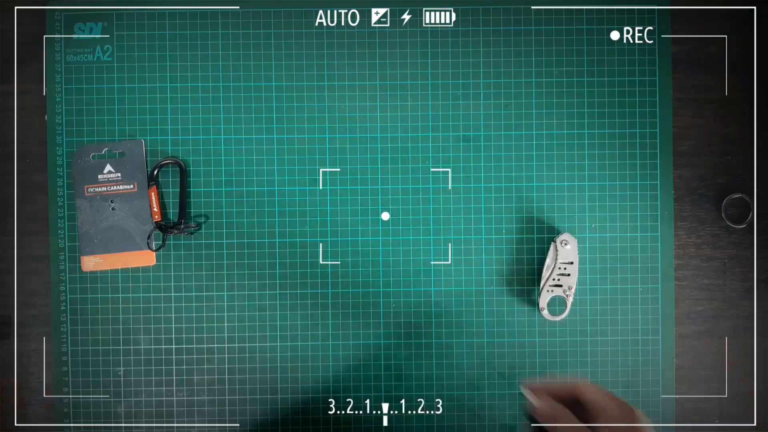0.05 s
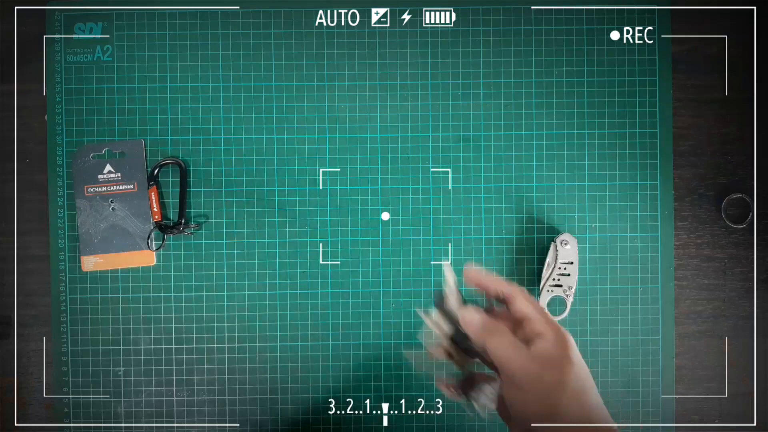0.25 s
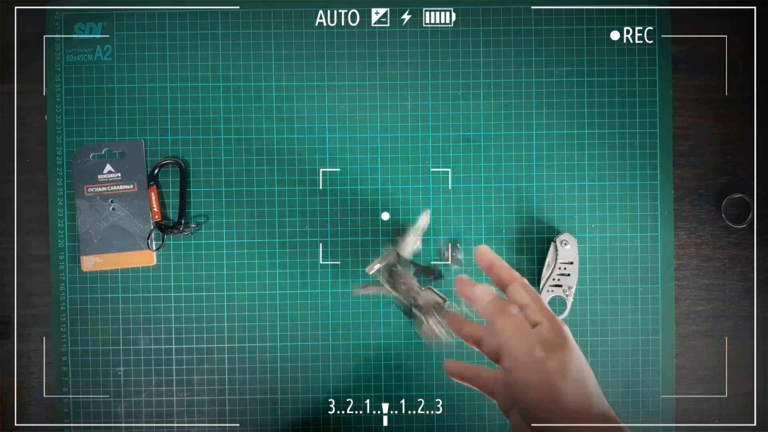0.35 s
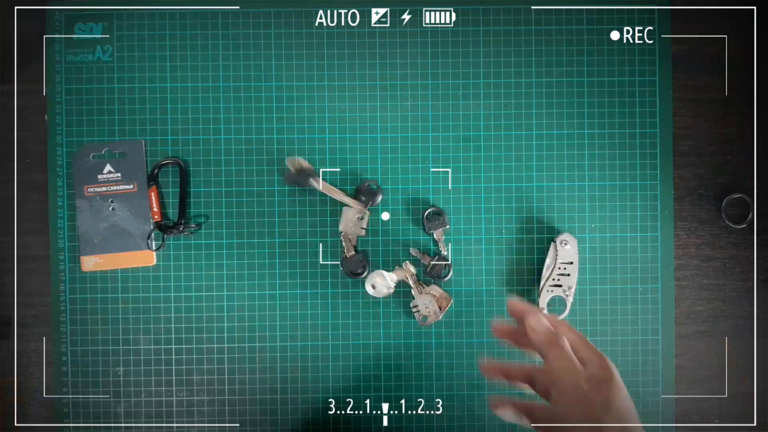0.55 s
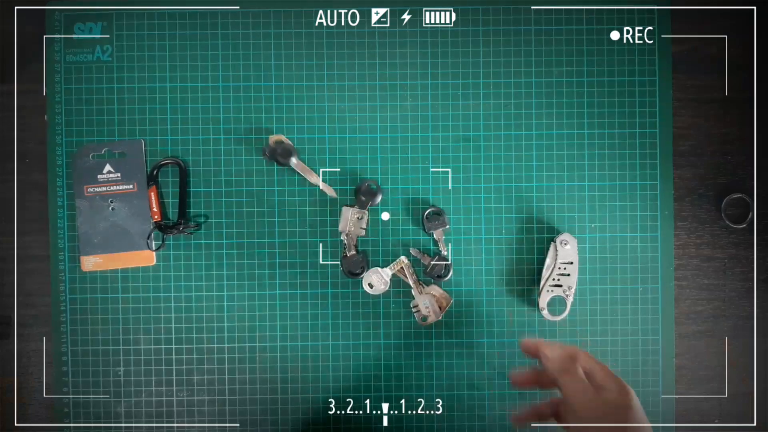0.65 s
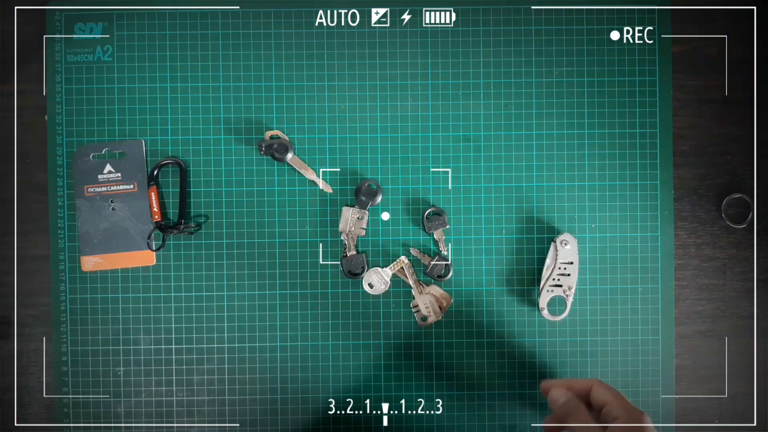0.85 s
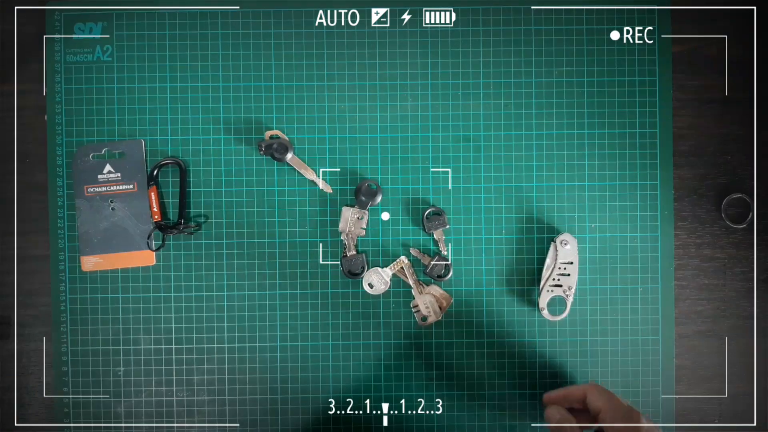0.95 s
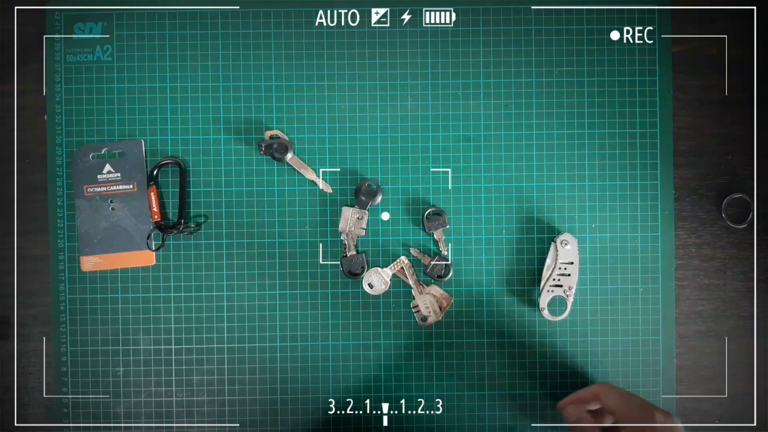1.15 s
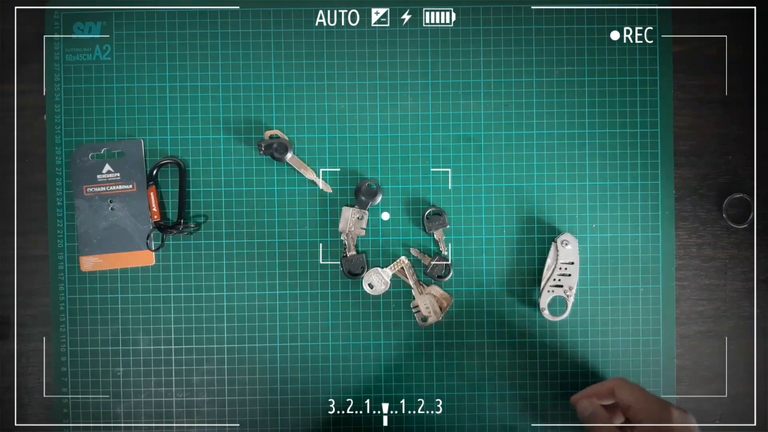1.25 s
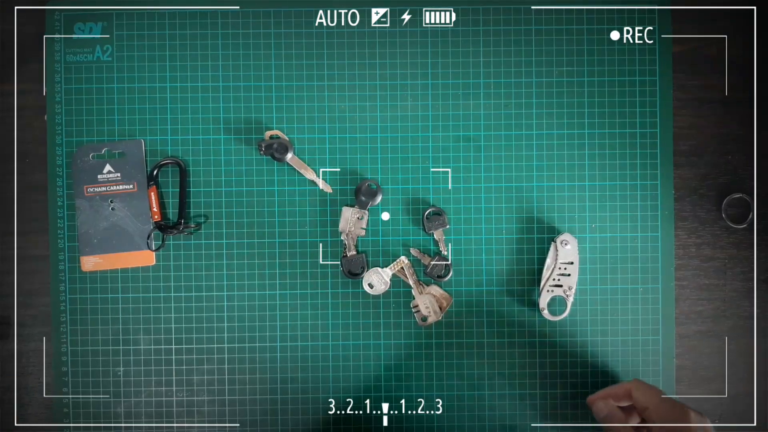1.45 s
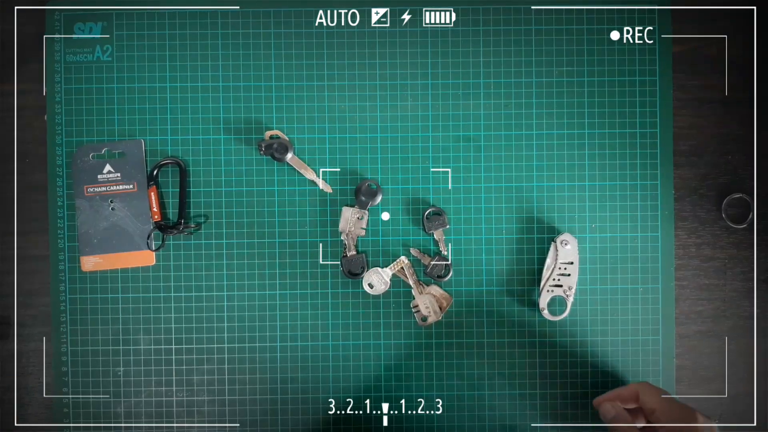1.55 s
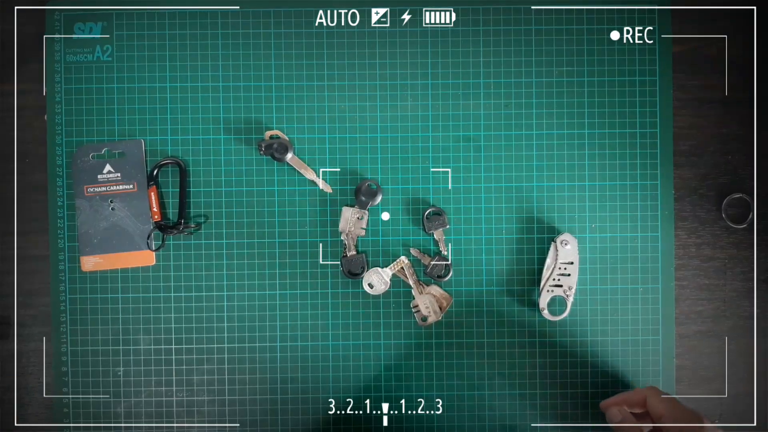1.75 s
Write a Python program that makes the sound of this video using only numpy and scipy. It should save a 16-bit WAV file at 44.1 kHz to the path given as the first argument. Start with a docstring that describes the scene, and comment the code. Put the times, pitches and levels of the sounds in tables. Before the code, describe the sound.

Keys jingle lightly as a sleeve rustles, then clatter onto a cutting mat, thumping the desk beneath. They ring briefly, slide and come to rest, with the microphones close by in a small room.

```python
"""A sleeve rustles and a bunch of keys clinks in a hand, then is tossed onto a cutting mat on a desk.
Each clash of metal excites the free vibration of a blade or ring, and the heavy key heads thump the
desk twice, driving its low modes. The blades ring on while the last keys slide, tip over and settle.
Two spaced microphones stand close by, in the reverberant field of a small room."""
import sys
import numpy as np
from scipy import signal
from scipy.fft import rfft, irfft
from scipy.io import wavfile
from scipy.ndimage import uniform_filter1d

SR = 44100
rng = np.random.default_rng(int(sys.argv[2]) if len(sys.argv) > 2 else 0)


def file_out(sig):
    """Save sig as 16-bit WAV at sys.argv[1]."""
    # one column per channel
    cols = np.atleast_2d(sig).T
    # limit, then scale
    lim = np.clip(cols, -1, 1)
    pcm = np.round(lim * 32767).astype(np.int16)
    wavfile.write(sys.argv[1], SR, pcm)


N = 79380

# Noise spectra. Each row: frequency in Hz, relative spectral density in dB.
SLEEVE_SPECTRUM = [(25, -39), (60, -9), (120, 2.5), (200, -6), (330, -8.5), (1400, -15.5), (3000, -24.5),
                   (15000, -35.5)]
AIR_SPECTRUM = [(25, -30), (82, -4.5), (178, -5), (209, -10.5), (322, -5.5), (389, -16.5), (848, -15),
                (15500, -48.5)]
TICK_SPECTRUM = [(300, -19), (1500, -14), (2500, 0), (5800, -11.5), (6800, 1.5), (8700, -7), (9700, -3.5),
                 (11300, -1), (12700, 5.5), (15000, -2)]  # metal on metal
THUD_SPECTRUM = [(30, -30.5), (70, -2.5), (120, 0), (500, -13), (8000, -69.5)]  # the struck mat
CLACK_SPECTRUM = [(150, -6.5), (500, 5.5), (690, -3), (880, 0), (2600, -3.5), (4200, -13.5), (6000, -19.5),
                  (15000, -17)]  # a key head on the mat
SNAP_SPECTRUM = [(500, -10), (2700, 0.5), (4800, -3), (15000, -34)]  # edge on edge
# Coherence of the sleeve and air noise. Each row: frequency in Hz, left-right correlation.
COHERENCE = [(30, 0.087), (120, 0.95), (300, 0.7), (1000, 0.12), (4000, 0.12), (15000, 0.11)]
# Envelopes. Each row: time in seconds, level in dB.
RUSTLE_LEVEL = [(0.028, -36.5), (0.078, -41), (.2, -39.5), (.39, -37), (.72, -45), (0.851, -69)]
RATTLE_LEVEL = [(.355, -44), (.41, -21.5), (.46, -32), (.51, -27), (.6, -36), (.63, -39.5)]
SLIDE_LEVEL = [(0.496, -53), (.52, -26.5), (.55, -48), (.6, -31), (.635, -45), (.72, -41), (0.751, -59.5)]
# Modes of each metal piece, and of the desk. Each row: frequency in Hz, level in dB, T60 in seconds.
KEY_MODES = { "held": [(6800, -21, .045), (9560, -9, .08), (9820, -8.5, .055), (10900, -15, 0.13),
             (13370, -0.5, .05), (12780, -1, 0.046)], "ring": [(6650, -9, 0.12), (10050, -1.5, 0.081),
             (13400, -3.5, .06)], "flat": [(6825, -4.5, .3), (9525, -3, .2), (10020, -13, .25),
             (10850, -10, .25), (13115, 0, .3)], "short": [(6970, -11.5, .088), (12150, -7.5, .03),
             (12570, 3, .09)], "thin": [(12560, -5.5, .19), (13170, -0.5, 0.14)], "long": [(6847, -6, .3),
             (11750, -4.5, .36), (12606, -2.5, .3), (12940, -8, .28), (15375, -4.5, .4)], }
DESK_MODES = [(108, -19.5, 0.3), (250, -19, .033), (321.4, -8, .063), (381, -14.5, .05), (527, -12, 0.089),
              (846, -14, .09), (970.5, -21, .06), (1198.6, -21.5, .1)]
# Metal striking metal. Each row: start in seconds, piece struck, ring level in dB, tick level in dB.
CLINK_EVENTS = [ (.1305, "ring", -34.5, -31), (.139, "held", -40.5, -39), (.2098, "held", -11, -20),
                (.217, "held", -26.5, -24), (.2255, "ring", -33, -26), (.2762, "held", -31.5, -29),
                (.2955, "flat", -31, -30), (.2965, "short", -27.5, -32.5), (.343, "short", -18.5, -25),
                (.347, "flat", -27, -32), (.352, "long", -36, -33), (.398, "flat", -24, -22.5),
                (.4016, "held", -16.5, -21.5), (.407, "ring", -12, -20.5), (.423, "short", -19.5, -22),
                (.432, "flat", -23.5, -23.5), (.4365, "thin", -14.5, -13), (.4435, "held", -17, -17.5),
                (.4555, "long", -9, -21), (.467, "short", -17.5, -20.5), (.492, "flat", -23, -28),
                (.575, "thin", -31, -22), ]
# Blows on the mat. Each row: start in seconds, thump, desk ring and clack levels in dB, contact in ms.
MAT_BLOWS = [ (0.3948, -10, -6.5, -4.5, 0.06), (0.3976, -9, 1, -12, .4), (.4036, -9.5, -5, -7, .4),
             (0.4097, -17, -13.5, -12, .4), (0.418, -12.5, -20.5, -13.5, 0.16),
             (0.4412, -11.5, -21, -15, 0.21), (0.4442, -7, -19, -9.5, 0.11), (.447, -17, -17, -13.5, .25),
             (0.4519, -1.5, -11.5, -6, .22), (0.6567, -31.5, -26, -56, .4), ]
# Hard edges of the key heads meeting. Each row: start in seconds, level in dB.
EDGE_SNAPS = [(0.3947, -15), (.452, -15), (0.6571, -24.5)]
# Desk resonances driven by sliding. Each row: frequency in Hz, width in Hz, level in dB.
HUM_RESONANCES = [(129, 16, -2.5), (317, 38, 0.5)]
# Decay of the room. Each row: frequency in Hz, T60 in seconds.
REVERB_T60 = [(100, 0.14), (330, 0.97), (1000, 0.74), (3000, 0.3254), (7000, 0.4536), (14000, 0.57)]
# Strength of the reverberation. Each row: frequency in Hz, level in dB.
REVERB_LEVEL = [(100, -20.5), (330, -15.5), (1000, -14), (3000, -7), (7000, -2), (14000, -12)]

KEYS_PAN_DB, THUMP_PAN_DB, CLACK_PAN_DB, AIR_PAN_DB = 1.2, 2.5, 2, 2
CHATTER_DB, TUMBLE_DB, PATCH_DB, GRAIN_DB = 6, 2, 1.5, 1.5  # rms level fluctuations
RING_RISE_S, RESTING_S, MAT_DAMPING_DB_PER_S = .00057, .62, 204
RATTLE_PER_S, RATTLE_SPREAD_DB, RATTLE_RING_DB, RATTLE_DETUNE = 220, 1.5, -2.5, .007
OVERTONES_DB, IN_HAND_DB, LET_GO_S, SHAKE_DB = -2.5, -5, .33, -8.5
PUSH_DB, GIVE_HZ, GIVE_DB, THUD_DB, CLACK_CORRELATION = 8, 103, -13.5, -11, .43
SCRAPE_START_S, SCRAPE_LENGTH_S, SCRAPE_DB = .645, .099, -42
ROOM_BUILD_S, RING_SEND_DB, TICK_SEND_DB, AIR_DB = .012, -12.5, -7, -51
LOW_CUT_HZ, HIGH_CUT_HZ = 40, 15650


def amp(db):
    """Amplitude ratio of a level in decibels."""
    return 10 ** (np.asarray(db) / 20)


def unit(x):
    """Normalisation to an rms of 1."""
    return x / np.sqrt(np.mean(x ** 2) + 1e-20)


def at_hz(table, hz):
    """Interpolation on a log-frequency axis."""
    f, value = np.transpose(table)
    return np.interp(np.log(hz + 1), np.log(f + 1), value)


def pan(db):
    """Channel gains for a level difference of left over right."""
    return amp([[db / 2], [-db / 2]])


def decay(t, t60):
    """Exponential damping: 60 dB lost in t60 seconds."""
    return np.exp(-np.log(1000) * t / t60)


def add(mix, start, sound):
    """Superposition of a sound from a start in seconds."""
    part = mix[:, round(start * SR):][:, :sound.shape[-1]]
    part += sound[..., :part.shape[1]]


def noise(spectrum, correlation, size):
    """Partial coherence: the two channels share part of one coloured noise."""
    shared, own = rfft(rng.standard_normal((2, size)))
    pair = np.array([shared, correlation * shared + np.sqrt(1 - correlation ** 2) * own])
    return unit(irfft(pair * amp(at_hz(spectrum, np.fft.rfftfreq(size, 1 / SR))), size))


def drifting_noise(spectrum):
    """Random modulation makes a steady noise drift in patches of time and frequency."""
    steady = noise(spectrum, at_hz(COHERENCE, np.fft.rfftfreq(N, 1 / SR)), size=N)
    bands = signal.stft(steady, nperseg=1024)[2]
    patches = uniform_filter1d(rng.standard_normal(bands.shape[1:]), size=10, axis=0)
    patches = unit(uniform_filter1d(patches, size=5, axis=1))
    return pan(AIR_PAN_DB) * unit(signal.istft(bands * amp(PATCH_DB * patches))[1][:, :N])


def sleeve():
    """Friction of cloth radiates broadband noise that fades after the toss."""
    level_db = np.interp(np.arange(N) / SR, *np.transpose(RUSTLE_LEVEL))
    return drifting_noise(SLEEVE_SPECTRUM) * amp(level_db)


def burst(spectrum, correlation, t60):
    """A chattering contact radiates a noise transient that decays exponentially."""
    hiss = noise(spectrum, correlation, size=4096)
    chatter = amp(CHATTER_DB * unit(uniform_filter1d(rng.standard_normal(hiss.shape[1]), size=40)))
    return hiss * unit(chatter) * decay(np.arange(hiss.shape[1]) / SR, t60)


def clink(piece, ring_db, tick_db, tuning=1):
    """An impact ticks and excites damped modes, each with its own phase at each microphone."""
    t = np.arange(SR // 2) / SR
    modes = sum(amp(db) * decay(t, t60) * np.sin(2 * np.pi * (tuning * hz * t + rng.random((2, 1))))
                for hz, db, t60 in KEY_MODES[piece])
    ring = amp(ring_db) * modes * (1 - np.exp(-t / RING_RISE_S))
    return ring, amp(tick_db) * burst(TICK_SPECTRUM, correlation=0, t60=.037)


def keys():
    """Clinks and a random rattle superpose; tumbling modulates their ring until the mat damps it."""
    rings, ticks, t = np.zeros((2, N)), np.zeros((2, N)), np.arange(N) / SR
    tumble = unit(uniform_filter1d(uniform_filter1d(rng.standard_normal((2, N)), size=500), size=350))
    times, levels = np.transpose(RATTLE_LEVEL)
    contacts = list(CLINK_EVENTS)
    for slot in np.arange(times[0], times[-1], 1 / RATTLE_PER_S):
        db = np.interp(slot, times, levels) + RATTLE_SPREAD_DB * rng.standard_normal()
        piece = ("held", "ring", "short")[rng.integers(0, high=3)]
        start = slot + rng.random() / RATTLE_PER_S
        tuning = 1 + RATTLE_DETUNE * rng.standard_normal()
        contacts.append((start, piece, db + RATTLE_RING_DB, db, tuning))
    for start, *contact in contacts:
        ring, tick = clink(*contact)
        add(rings, start, ring)
        add(ticks, start, tick)
    rings *= amp(TUMBLE_DB * tumble - MAT_DAMPING_DB_PER_S * np.maximum(t - RESTING_S, 0))
    return pan(KEYS_PAN_DB) * rings, pan(KEYS_PAN_DB) * ticks


def overtones(contacts):
    """Every contact excites faint, dense metal modes, more weakly while the fingers hold the keys."""
    t = np.arange(SR // 3) / SR
    draws = rng.random((48, 3))
    modes_hz, phases = np.interp(draws[:, 0], [0, 1], [2500, 13960]), draws[:, 1:, None]
    ring = sum(amp(at_hz(TICK_SPECTRUM, hz) / 2) * np.sin(2 * np.pi * (hz * t + phase))
               for hz, phase in zip(modes_hz, phases))
    ring *= decay(t, t60=.1785)
    drive = contacts * amp(OVERTONES_DB + IN_HAND_DB * (np.arange(N) / SR < LET_GO_S))
    return signal.fftconvolve(drive, ring / np.linalg.norm(ring[0]), axes=1)[:, :N]


def landing():
    """Each impact compresses the mat and excites the desk's modes; the key heads clack and snap."""
    out, t = np.zeros((2, N)), np.arange(SR // 2) / SR
    for start, thump_db, ring_db, clack_db, contact_ms in MAT_BLOWS:
        u = t / (contact_ms / 1000)  # time in contact durations
        phases = .057 * rng.standard_normal((len(DESK_MODES), 2, 1))  # turns
        modes = sum(amp(db) * decay(t, t60) * np.sin(2 * np.pi * (hz * t + phase))
                    for (hz, db, t60), phase in zip(DESK_MODES, phases))
        desk = amp(ring_db) * modes * (1 - np.exp(-u ** 2))
        push = amp(PUSH_DB) * u * (2 - u) * np.exp(-u)
        give = -amp(GIVE_DB) * np.sin(2 * np.pi * GIVE_HZ * t) * decay(t, t60=.045)
        thud = burst(THUD_SPECTRUM, correlation=.051, t60=.07)
        clack = burst(CLACK_SPECTRUM, CLACK_CORRELATION, t60=.024)
        add(out, start, pan(THUMP_PAN_DB) * (amp(thump_db) * (push + give) + desk))
        add(out, start, amp(thump_db + THUD_DB) * thud)
        add(out, start, amp(clack_db) * pan(CLACK_PAN_DB) * clack)
    for start, db in EDGE_SNAPS:
        add(out, start, amp(db) * pan(CLACK_PAN_DB) * burst(SNAP_SPECTRUM, CLACK_CORRELATION, t60=.013))
    return out


def desk_hum():
    """Forced vibration: keys sliding on the mat drive two broad, low resonances of the desk."""
    t, hz = np.arange(N) / SR, np.fft.rfftfreq(N, 1 / SR)
    response = sum(amp(db) / (1 + ((hz - centre) / width) ** 2) ** 2
                   for centre, width, db in HUM_RESONANCES)
    hum = unit(irfft(rfft(rng.standard_normal(N)) * response, N))
    times, levels = np.transpose(SLIDE_LEVEL)
    return pan(THUMP_PAN_DB) * hum * np.interp(t, times, amp(levels), left=0, right=0)


def scrape():
    """Sliding friction under the last key head makes a grainy noise that swells and fades."""
    progress = np.clip((np.arange(N) / SR - SCRAPE_START_S) / SCRAPE_LENGTH_S, 0, 1)
    grain = amp(GRAIN_DB * unit(uniform_filter1d(rng.standard_normal(N), size=60)))
    friction = unit(grain) * noise(CLACK_SPECTRUM, CLACK_CORRELATION, size=N)
    return amp(SCRAPE_DB) * np.sin(np.pi * progress) * friction


def reverberation(sound):
    """A diffuse field builds up, then decays at its own rate in each band."""
    hz, t, bands = signal.stft(rng.standard_normal((2, SR)), SR, nperseg=256)
    envelope = decay(t, at_hz(REVERB_T60, hz)[:, None]) * (1 - np.exp(-(t / ROOM_BUILD_S) ** 2))
    energy = SR * np.mean(envelope ** 2, axis=1, keepdims=True)
    envelope *= amp(at_hz(REVERB_LEVEL, hz))[:, None] / np.sqrt(energy)
    return signal.fftconvolve(sound, signal.istft(bands * envelope)[1], axes=1)[:, :N]


def scene():
    """Direct sound, reverberation and the room's quiet air add by superposition."""
    rings, ticks = keys()
    blows = landing()
    rings += overtones(ticks + amp(SHAKE_DB) * blows)
    rustle = sleeve()
    tail = reverberation(blows + amp(RING_SEND_DB) * rings + amp(TICK_SEND_DB) * ticks)
    direct = rustle + rings + ticks + blows + desk_hum() + scrape()
    return direct + tail + amp(AIR_DB) * drifting_noise(AIR_SPECTRUM)


def record(dry):
    """The microphones lose the deepest bass and saturate softly on peaks; a low-pass limits the band."""
    highpass = signal.butter(2, LOW_CUT_HZ, "highpass", fs=SR, output="sos")
    saturated = np.tanh(signal.sosfilt(highpass, dry))
    lowpass = signal.firwin(511, HIGH_CUT_HZ, window=("kaiser", 8), fs=SR)
    return signal.oaconvolve(saturated, lowpass[None], "same", axes=1)


dry = scene()
out = record(dry)
file_out(out)
```